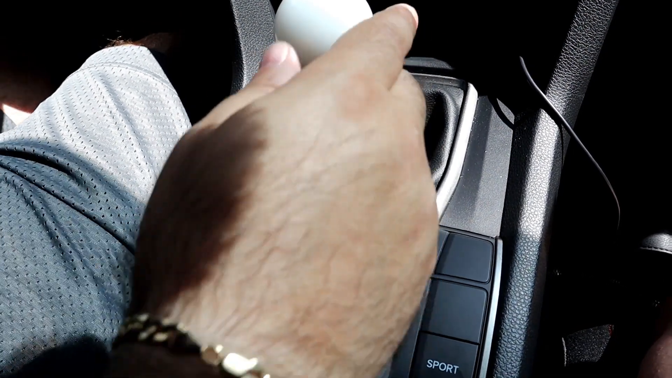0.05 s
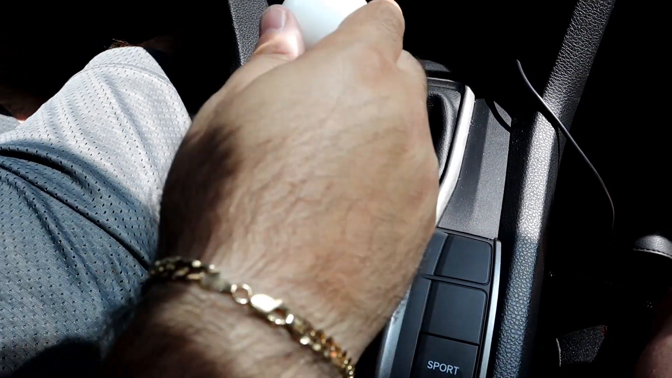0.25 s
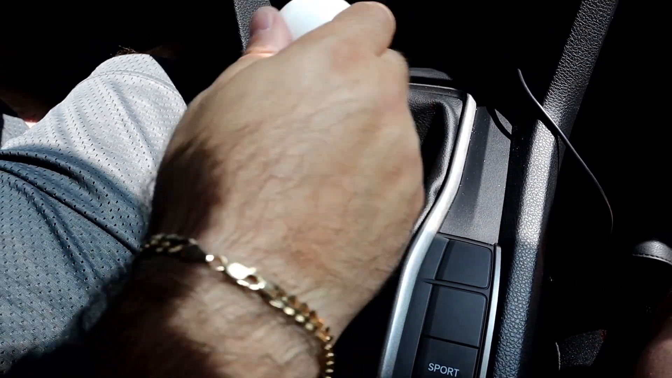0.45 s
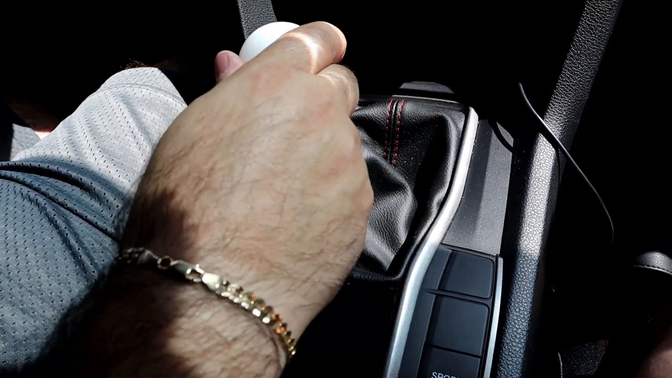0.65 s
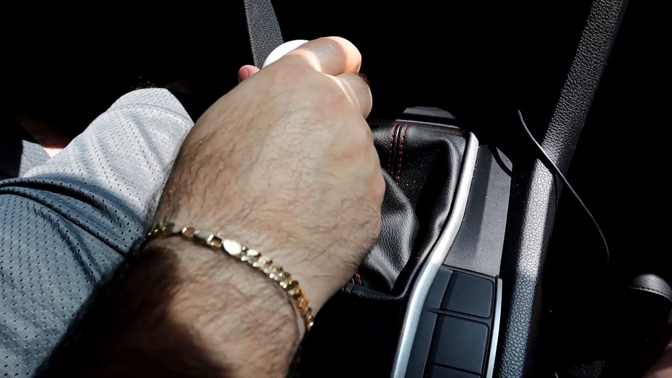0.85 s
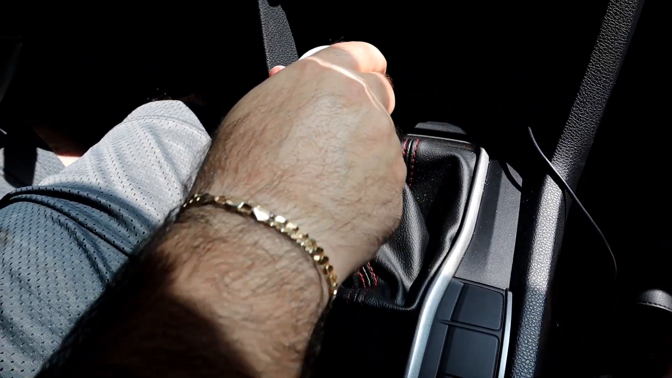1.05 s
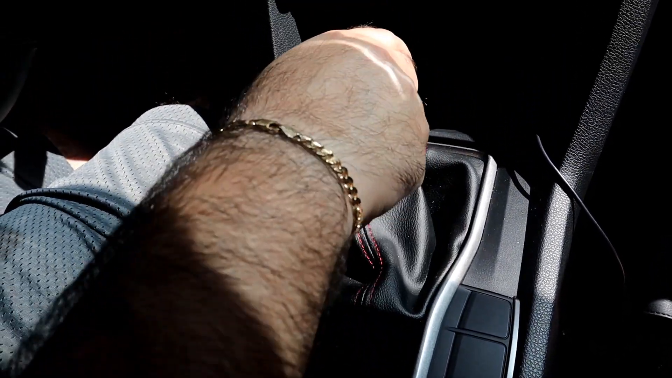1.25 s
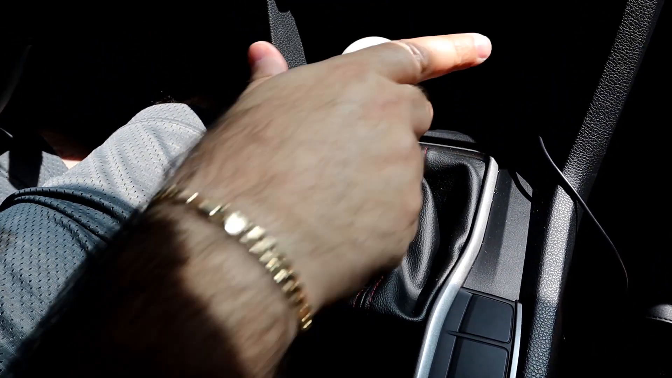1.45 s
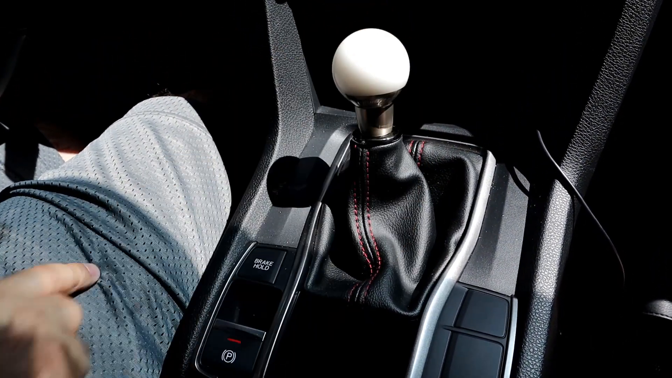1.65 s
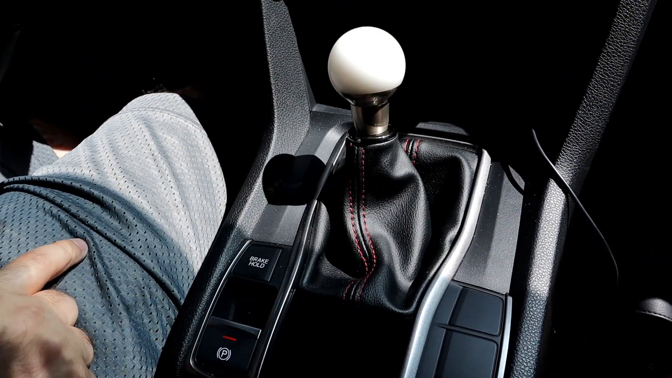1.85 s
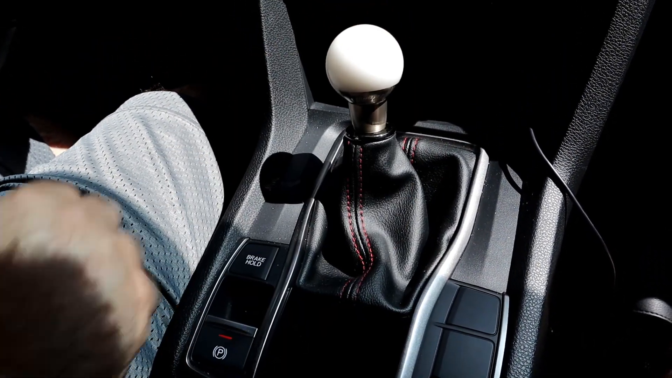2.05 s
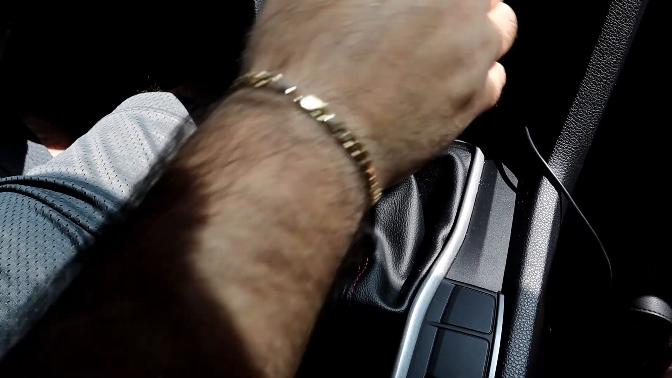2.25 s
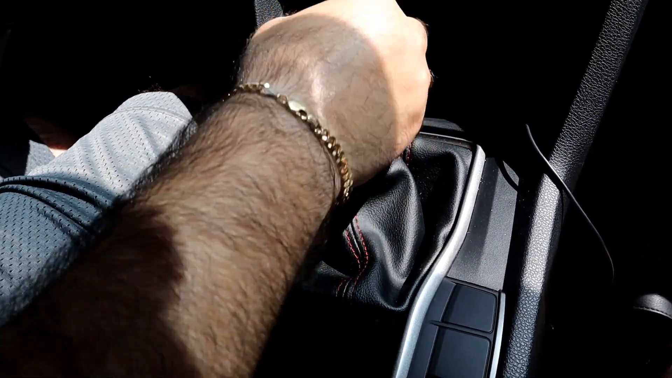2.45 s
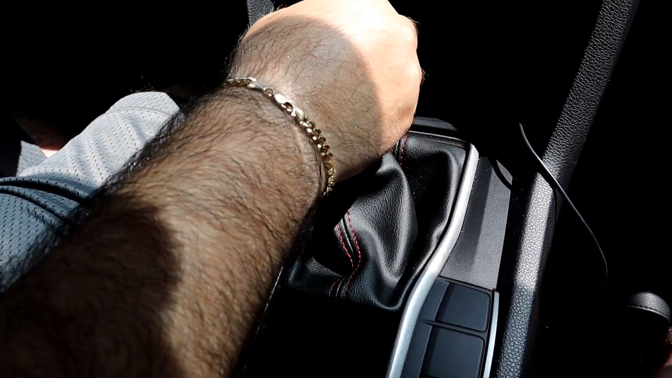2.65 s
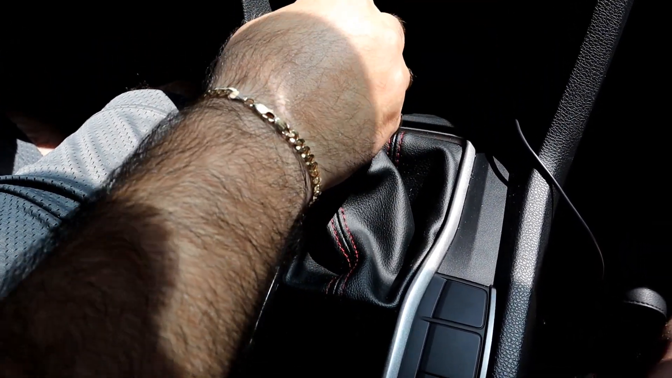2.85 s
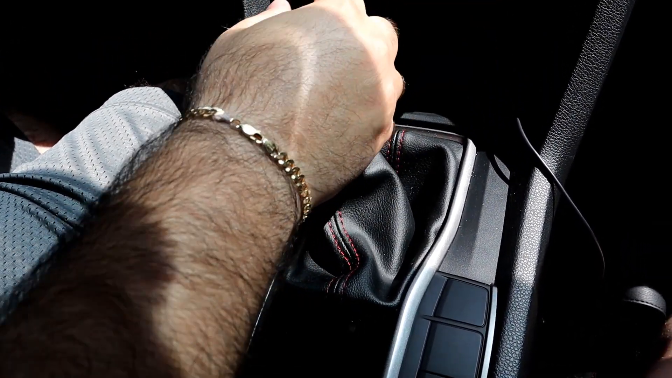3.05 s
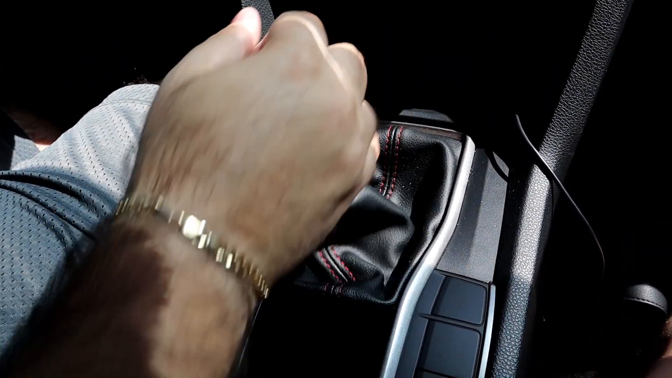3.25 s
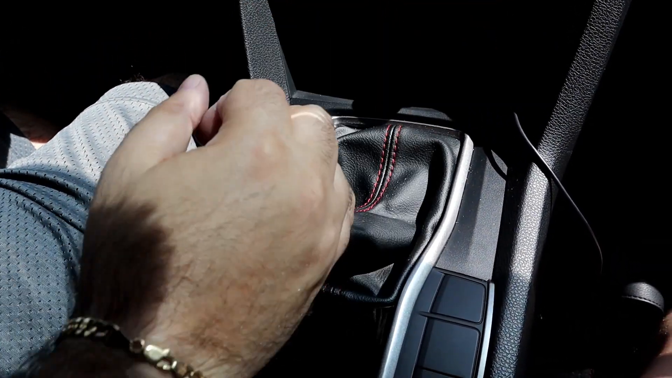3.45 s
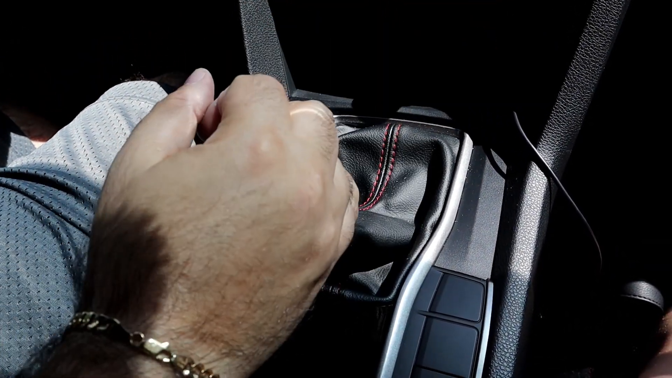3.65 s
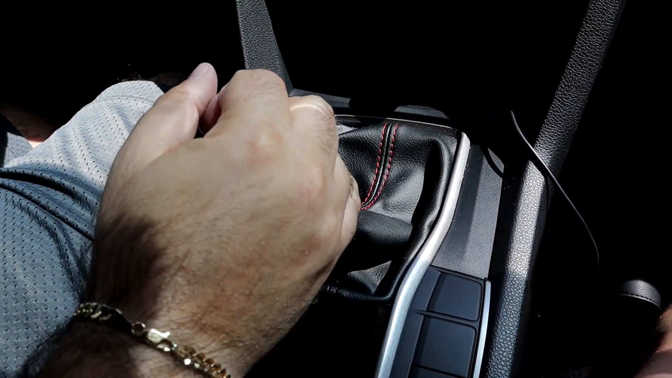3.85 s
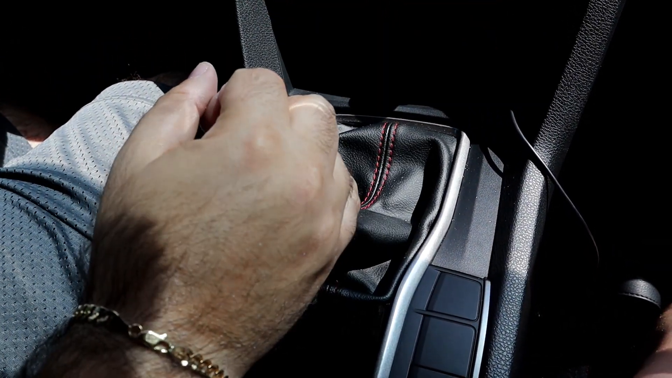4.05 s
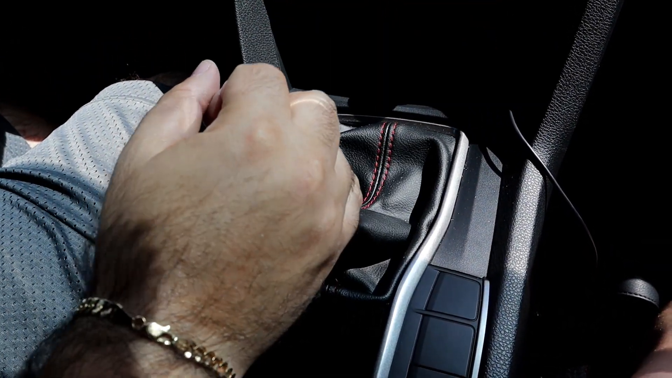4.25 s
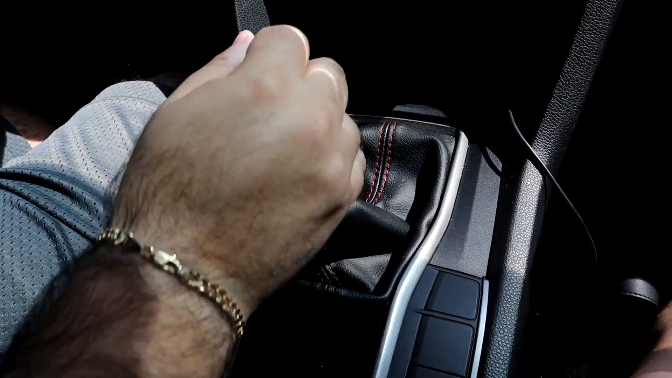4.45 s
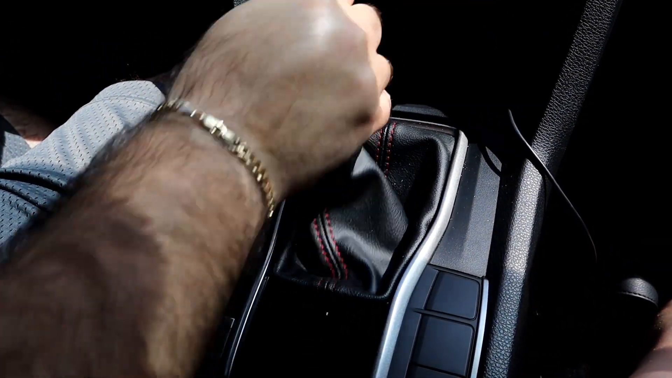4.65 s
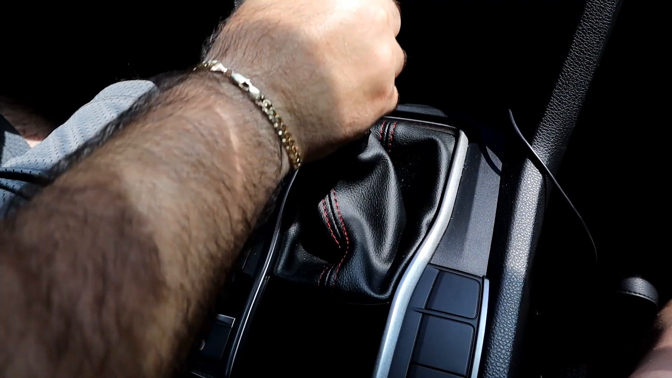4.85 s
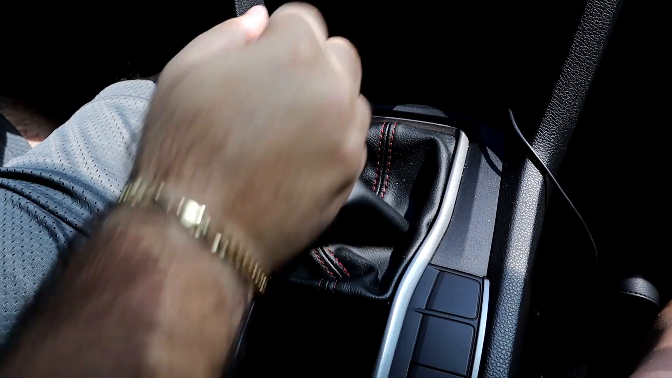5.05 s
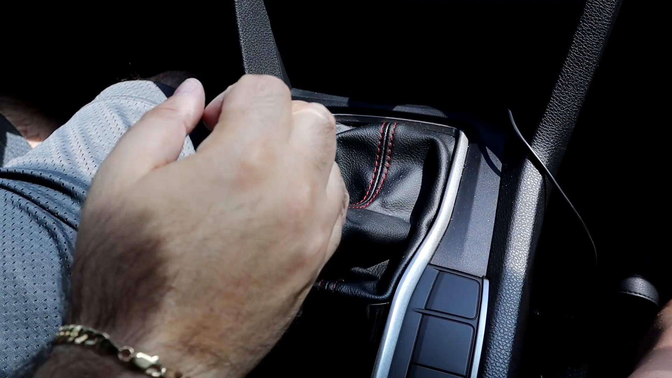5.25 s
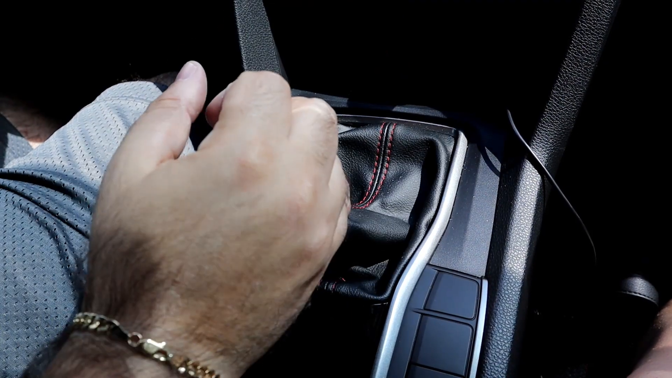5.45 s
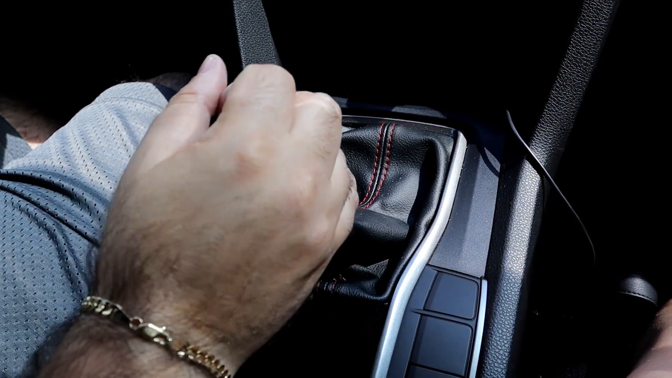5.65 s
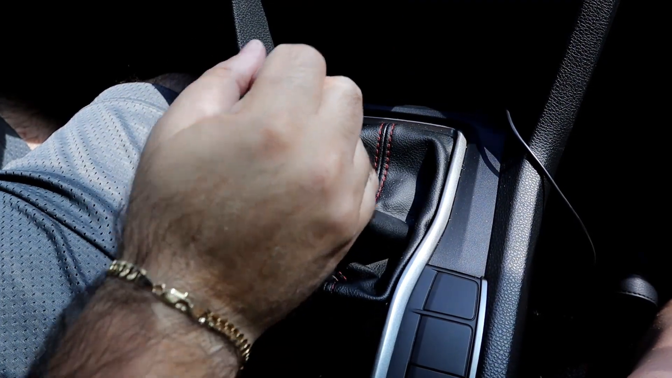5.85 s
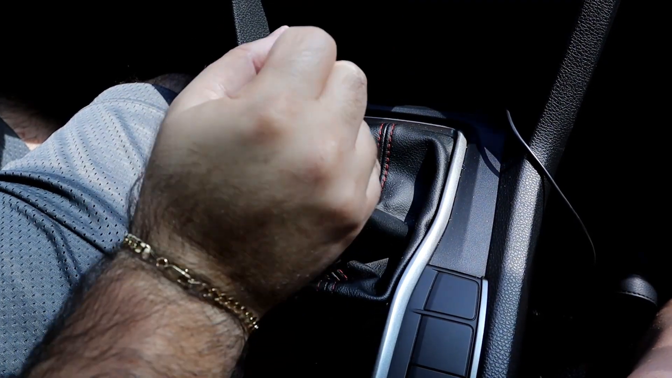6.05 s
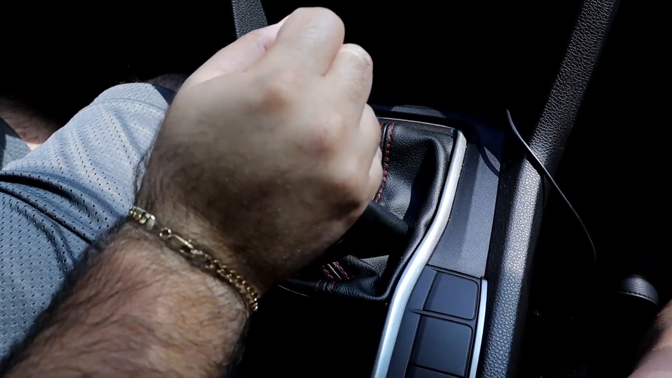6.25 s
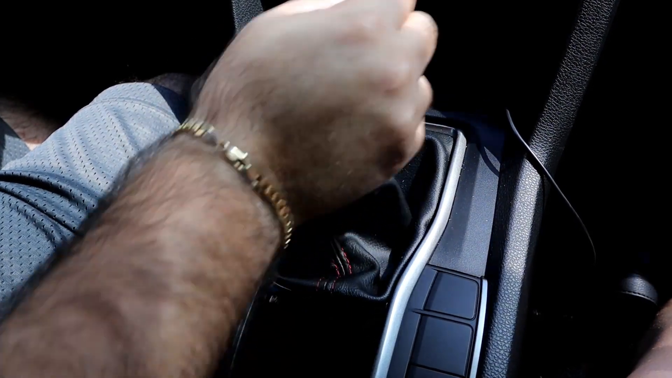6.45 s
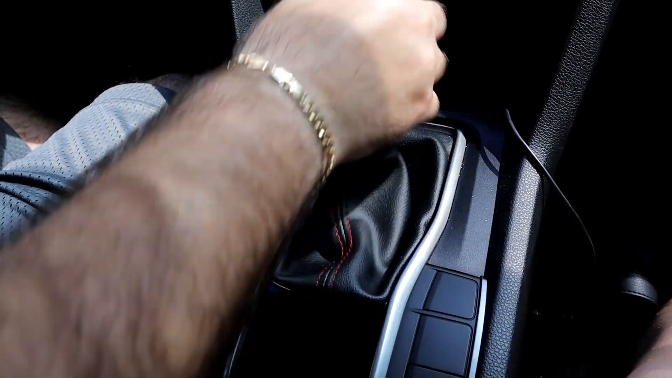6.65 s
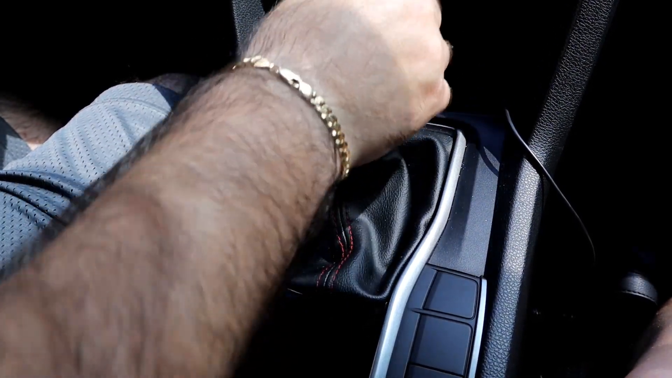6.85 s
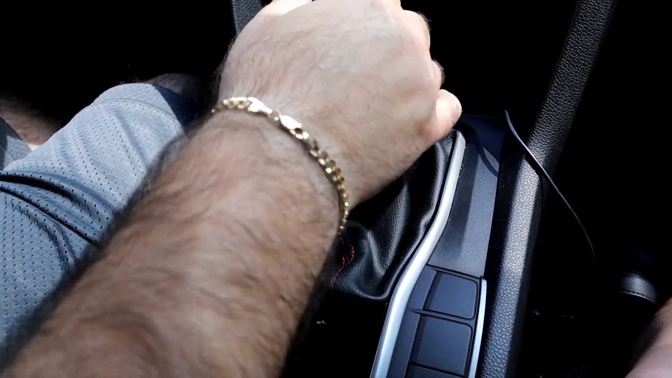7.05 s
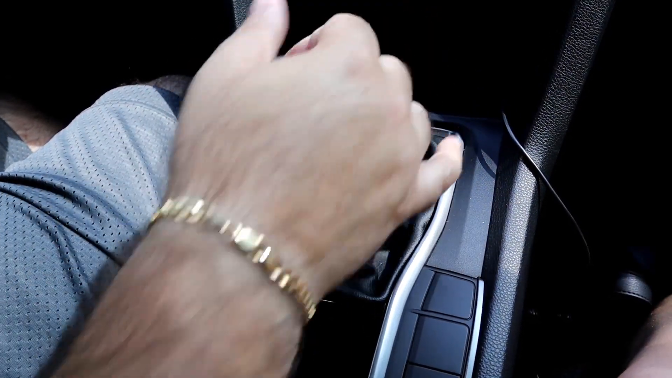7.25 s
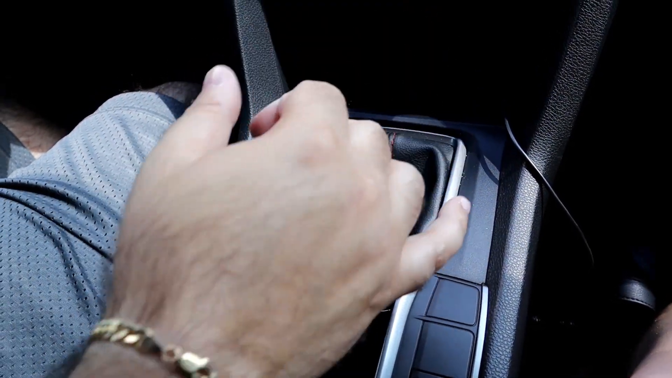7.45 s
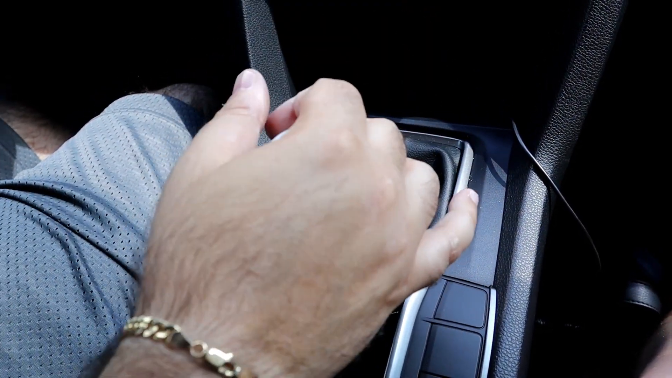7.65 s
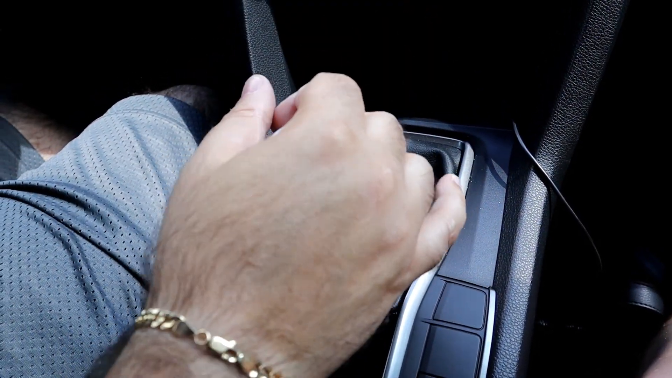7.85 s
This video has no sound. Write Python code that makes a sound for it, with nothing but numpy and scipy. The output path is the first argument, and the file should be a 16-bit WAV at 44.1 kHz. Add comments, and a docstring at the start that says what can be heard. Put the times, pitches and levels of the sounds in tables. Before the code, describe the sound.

A manual gear lever clunks and knocks through its gate inside a parked car while a four-cylinder engine idles with a low, steady boom.

```python
"""A four-cylinder engine idles and makes the cabin of a parked car boom: drifting firing orders over noise.
A hand works the manual gear lever: it slides through the gate as filtered noise, clicks over the detent and
clunks against its stop, as impulses that ring the modes of linkage and console. The leather boot creaks.
A chain bracelet chinks in short noise bursts, and the hand brushes over clothing in swells of noise.
The level dips after the hardest clunks and creeps back."""
import sys
import numpy as np
from scipy import signal
from scipy.io import wavfile
from scipy.ndimage import uniform_filter1d

SR = 44100
rng = np.random.default_rng(int(sys.argv[2]) if len(sys.argv) > 2 else 0)


def wav_out(sig):
    """Save sig, one row per channel (or a flat mono array), as 16-bit PCM at SR to the path in sys.argv[1]."""
    wavfile.write(sys.argv[1], SR, np.round(np.clip(np.atleast_2d(sig).T, -1, 1) * 32767).astype(np.int16))


N = 348390
TIME = np.arange(N) / SR


def from_db(db):
    """Amplitude ratio of a level in dB."""
    return 10 ** (np.asarray(db) / 20)


def rms_one(x):
    """Scale to an rms of 1."""
    return x / np.sqrt(np.mean(x ** 2) + 1e-20)


def in_time(rows):
    """Value column of a (time, value) curve, sample by sample."""
    times_s, values = np.transpose(rows)
    return np.interp(TIME, times_s, values)


def at_hz(points, hz):
    """Read a table on a log-frequency axis."""
    points = np.array(points)
    return np.interp(np.log(hz), np.log(points[:, 0]), points[:, 1])


def drift(rate_hz):
    """Slow random wander with a spread of 1, computed at every 100th sample."""
    r = np.exp(-200 * np.pi * rate_hz / SR)
    white = rng.standard_normal(N // 100 + 1002)
    slow = signal.lfilter([1], [1, -2 * r, r * r], white)[1000:]   # drop the run-in
    return np.interp(np.arange(N) / 100, np.arange(len(slow)), rms_one(slow))


def filtered(x, cutoff_hz, kind):
    """Second-order Butterworth design: low, high or band."""
    return signal.sosfilt(signal.butter(2, cutoff_hz, kind, fs=SR, output="sos"), x)


def clicks(times_s, heights):
    """One impulse at each time."""
    out = np.full(N, 1e-18)
    out[np.round(np.asarray(times_s) * SR).astype(int)] += heights
    return out


def ring(force, hz, t60_s):
    """Damped resonance: a unit click sets a sine of height 1 ringing."""
    r = np.exp(-np.log(1000) / (t60_s * SR))
    w = 2 * np.pi * hz / SR
    return signal.lfilter([0, np.sin(w)], [1, -2 * r * np.cos(w), r * r], force)


def fade(force, t60_s, swell_hz):
    """Envelope that swells within about a period of swell_hz, then decays; overlaps add in power."""
    decay = np.exp(-2 * np.log(1000) / (t60_s * SR))
    envelope = np.sqrt(signal.lfilter([1], [1, -decay], force ** 2))
    r = np.exp(-np.pi * swell_hz / SR)
    return signal.lfilter([(1 - r) ** 2], [1, -2 * r, r * r], envelope)


def noise_bands(spectrum):
    """Yield log-spaced noise bands as (Hz, band), total power 1 shared out by the spectrum."""
    edges_hz = np.geomspace(spectrum[0][0], 16500, 23)
    centres_hz = np.sqrt(edges_hz[1:] * edges_hz[:-1])
    white = rng.standard_normal((2, N))   # neighbouring bands use different noise
    gains = from_db(at_hz(spectrum, centres_hz)) * np.sqrt(np.diff(edges_hz))
    gains = gains / np.linalg.norm(gains)
    for k, hz in enumerate(centres_hz):
        yield hz, gains[k] * rms_one(filtered(white[k % 2], edges_hz[k:k + 2], "band"))


def swells(rows, roundness=1.42):
    """Each (s, peak dB, rise s, fall s) climbs 20 dB to its peak and sinks again; overlaps add in power."""
    power = np.zeros(N)
    for s, db, rise_s, fall_s in rows:
        near = slice(*np.searchsorted(TIME, [s - 3 * rise_s, s + 3 * fall_s]))
        away = np.maximum((s - TIME[near]) / rise_s, (TIME[near] - s) / fall_s)
        power[near] += from_db(db - 20 * away ** roundness) ** 2
    return np.sqrt(power)


def rub(strokes, colour, grain_db):
    """Friction: noise that catches and slips in fine grains of limited size."""
    grain = from_db(grain_db * np.tanh(drift(71)))
    return swells(strokes) * grain * sum(band for _, band in noise_bands(colour))


# idle speed: (time [s], firing rate [1/s])
IDLE_SPEED = [(0.0, 24.28), (0.55, 24.3), (1.05, 24.25), (1.5, 24.0), (2.4, 24.01), (3.3, 24.01),
              (4.2, 23.96), (5.1, 23.93), (5.4, 24.2), (6.0, 23.92), (7.0, 24.06), (7.9, 23.98)]
# build-up of the cabin boom: (time [s], relative level [dB])
BOOM_BUILDUP = [(0, -4.5), (.9, -3), (1.05, 0), (7.9, 1)]
# engine orders: (multiple of the firing rate, relative level [dB])
FIRING_ORDERS = [(1, -14), (2, 0), (3, -1), (4, 0.5), (5, -8), (6, -17), (7, -29.5), (8, -8), (9, -44.5),
                 (10, -45.5), (11, -23), (12, -30.5), (13, -28.5), (14, -37.5), (15, -26.5), (16, -33),
                 (17, -45.5), (18, -44), (19, -43), (20, -35.5)]


def engine(first_firing_s=.0318, smear_rad=.42, waver=0.13, upper_waver=0.47):
    """Firing orders boom in the cabin, which delays the higher ones more; the upper orders waver most."""
    rate = in_time(IDLE_SPEED)
    boom_db = in_time(BOOM_BUILDUP)
    firing_phase = 2 * np.pi * (np.cumsum(rate) / SR - first_firing_s * rate[0])
    second_gain = from_db(-17 + boom_db)
    other_gain = from_db(-19.5 + 0.24 * boom_db)   # these follow only part of the build-up
    out = 0
    for order, db in FIRING_ORDERS:
        gain = second_gain if order == 2 else other_gain
        unsteady = waver if order < 9 else upper_waver
        angle = order * firing_phase - smear_rad * order ** 2
        tone = (1 + unsteady * drift(6.6)) * np.cos(angle) + unsteady * drift(5.6) * np.sin(angle)
        out = out + np.sqrt(2) * from_db(db) * gain * tone
    return out, firing_phase


# engine and fan noise through the bulkhead: (frequency [Hz], relative density [dB per Hz])
BULKHEAD_NOISE = [(30, -0.5), (130, 1.5), (220, -4.5), (330, -8.5), (460, -12.5), (720, -14), (1100, -20),
                  (1400, -21.5), (1750, -31), (2050, -28.5), (2500, -38), (4000, -40.5), (7000, -45),
                  (15500, -48.5)]


def cabin_noise(firing_phase, level_db=-32, throb=0.46, patchy_db=2.0, whine_hz=3284, whine_db=-74):
    """Mechanical noise throbs with the engine under smooth fan hiss and a thin whine."""
    pulse = 1 + throb * np.cos(2 * firing_phase)
    noise = 0
    for hz, band in noise_bands(BULKHEAD_NOISE):
        noise = noise + band * (pulse * from_db(patchy_db * drift(8.1)) if hz < 550 else 1)
    whine = np.sqrt(2) * np.sin(2 * np.pi * np.cumsum(whine_hz + 6 * drift(20)) / SR)
    return from_db(level_db) * noise + from_db(whine_db) * whine


# hand strokes over clothing: (time [s], peak level [dB], rise [s], fall [s])
BRUSH_STROKES = [(.15, -57, .3, .25), (1.755, -45, 0.18, 0.055), (2.11, -43.5, .14, .08),
                 (7.46, -47, .06, .05)]
# colour of the brushing: (frequency [Hz], relative density [dB per Hz])
CLOTH_COLOUR = [(500, -8.5), (1400, 9), (2100, 1.5), (3200, 2), (5000, -2), (6500, -8.5), (7800, -12.5),
                (15000, -21)]


def clothing():
    """The hand brushes over cloth: grainy friction noise in slow swells."""
    return rub(BRUSH_STROKES, CLOTH_COLOUR, grain_db=1.0)


# bracelet links: (time [s], relative level [dB], pitch [Hz])
BRACELET_CHINKS = [(0.143, -46, 2640), (0.301, -46, 2870), (0.754, -39, 2140), (1.093, -53, 4200),
                   (1.437, -48, 3800), (2.451, -49, 4100), (3.445, -47, 2870), (4.701, -46, 4100),
                   (5.126, -42, 3400), (6.474, -40, 3500), (6.509, -38, 3500), (6.538, -49, 4100),
                   (7.374, -55, 4880)]


def bracelet(level_db=1, t60_s=0.05, width=0.11):
    """Small links jostle: each chink is a short narrow noise burst at its own pitch."""
    out, white = 0, rng.standard_normal(N)
    for s, db, hz in BRACELET_CHINKS:
        band = filtered(white, [hz / (1 + width), hz * (1 + width)], "band")
        out = out + rms_one(band) * fade(clicks([s], from_db(db + level_db)), t60_s, hz)
    return out


# folds of the leather boot: (frequency [Hz], relative level [dB], t60 [s])
FOLD_MODES = [(2100, 0.5, 0.0053), (2430, -0.5, 0.0051), (2580, 0, 0.0074)]
# flexing of the boot: (time [s], peak level [dB], rise [s], fall [s])
BOOT_FLEXES = [(.58, -51, 0.069, .06), (3.31, -50, 0.12, .12), (3.435, -45, 0.16, 0.036),
               (4.39, -52, .12, 0.29), (4.67, -52.5, .2, .1), (5.14, -49.5, .13, 0.13),
               (5.27, -51, 0.085, 0.052), (5.69, -52, 0.049, 0.077), (5.78, -54, 0.068, 0.074)]


def boot(slips_per_s=600, uneven_db=4, top_hz=3000, flex_db=4):
    """Folds of soft leather stick and slip; each rings at its own pitch and flexes in its own time."""
    creak = 0
    for hz, db, t60_s in FOLD_MODES:
        sizes = from_db(uneven_db * np.clip(rng.standard_normal(N), -2, 2))
        slips = (rng.random(N) < slips_per_s / SR) * sizes
        flex = from_db(db + flex_db * np.tanh(drift(24)))
        creak = creak + flex * ring(np.diff(slips, prepend=0), hz, t60_s)
    return swells(BOOT_FLEXES) * rms_one(filtered(creak, top_hz, "low"))


# lever going into gear: (stop time [s], stop knock level [dB], stop click level [dB], stop thud level [dB],
# seating delay [s], seating boom level [dB], seating thud reference [dB], slide peak level [dB], approach [s])
GEAR_SHIFTS = [(0.598, -27, -57, -19, 0.0044, -10, -16.5, -45.5, 0.071),
               (1.183, -15, -39, -13, .010, -15.5, -20, -38, 0.084),
               (3.404, -23.5, -43, -16.5, .011, -16.5, -9.5, -40.5, 0.13),
               (4.782, -17.5, -36.5, -11.5, 0.0081, -15.5, -13.5, -37, 0.055),
               (5.198, -20, -25, -9, .025, -16, -7, -44, 0.22),
               (6.495, -19.5, -33.5, -22, .015, -20, -12.5, -38.5, .04),
               (6.707, -15, -30.5, -15, 0.0065, -3, -9.5, -42.5, 0.046),
               (7.405, -18.5, -38.5, -13.5, .012, -16, -3, -39.5, 0.039)]
# lighter taps in the gate: (time [s], thud level [dB], knock level [dB], click level [dB]), all relative
GATE_TAPS = [(1.131, -22.5, -34, -64), (2.475, -29, -30.5, -44.5), (3.311, -22.5, -33, -55),
             (4.667, -26, -30, -52), (4.675, -19.5, -24.5, -53), (4.755, -19, -32, -58),
             (4.975, -25, -30, -53), (5.209, -12, -22, -48), (6.666, -21.5, -38, -55),
             (7.285, -19.5, -33.5, -54)]


def slides(release_s=0.05, tap_slide_db=-21, tap_approach_s=0.036):
    """The lever slides up to every shift and tap, then comes to rest: (s, peak dB, rise s, fall s)."""
    into_gear = [(s, db, approach_s, release_s) for s, *_, db, approach_s in GEAR_SHIFTS]
    in_gate = [(s, knock + tap_slide_db, tap_approach_s, release_s) for s, _, knock, _ in GATE_TAPS]
    return into_gear + in_gate


# colour of the sliding: (frequency [Hz], relative density [dB per Hz])
GATE_COLOUR = [(300, -3), (900, 8.5), (1900, -2), (2600, -8), (3600, -13), (6000, -17.5), (14000, -30)]
# lever, housing and console: (frequency [Hz], relative level [dB], t60 [s])
LINKAGE_MODES = [(243, -10.5, 0.062), (298.6, 1, 0.053), (351, -2.5, 0.075), (393.5, -2, 0.077),
                 (556, -6.5, 0.093), (682, -2.5, 0.059), (783, -3.5, 0.069), (1061, -2, 0.034),
                 (1376, 0, 0.047), (1580, 0.5, 0.048), (2062, -6, 0.067), (2554, -7.5, 0.037),
                 (3557, 5, 0.017), (3950, -16, 0.017), (5920, -15.5, 0.042)]


def gate_friction(grain_db=1.5, body_db=7):
    """The sliding lever hisses in its gate and faintly rings the parts that its contacts strike."""
    friction = rub(slides(), GATE_COLOUR, grain_db)
    body = 0
    for k, (hz, _, t60_s) in enumerate(LINKAGE_MODES):
        unity = 2 * np.log(1000) / (t60_s * SR)   # gain near 1 at the mode's pitch
        body = body + (-1) ** k * ring(friction, hz, t60_s) * unity
    return friction + from_db(body_db) * body


def chatter(ticks_per_s=130, level_db=-10, uneven_db=3, low_hz=1500):
    """Play in the linkage ticks at random during slides; such light touches ring mainly the upper modes."""
    sizes = from_db(level_db + uneven_db * np.tanh(rng.standard_normal(N)))
    ticks = (rng.random(N) < ticks_per_s / SR) * sizes * swells(slides()) + 1e-18
    ticks = filtered(ticks, low_hz, "high")
    out = 0
    for k, (hz, db, t60_s) in enumerate(LINKAGE_MODES):
        out = out + (-1) ** k * from_db(db) * ring(ticks, hz, t60_s)
    return out


def contacts(catch_lead_s=0.011, settle_s=.014, settle_loss_db=10.5, hard_boom_db=-2.5):
    """A shift is catch, stop, seating, settling; a tap is one contact: (s, boom, thud, knock, click dB)."""
    rows = [(s, thud + hard_boom_db, thud, knock, click) for s, thud, knock, click in GATE_TAPS]
    for s, knock, click, thud, seats_after_s, seat_boom, seat_thud, _, _ in GEAR_SHIFTS:
        stop = np.array([thud + hard_boom_db, thud, knock, click])
        catch = stop + [-7, -7, -13, -19]   # the detent catches more softly, just before the stop
        seat = np.array([seat_boom, seat_thud, knock - 14, click - 14.5])
        seated_s = s + seats_after_s
        rows += [(s - catch_lead_s, *catch), (s, *stop), (seated_s, *seat)]
        rows += [(seated_s + settle_s, *(seat - settle_loss_db))]   # rocks once more
    return rows


# centres of boom, thud, knock and click: (frequency [Hz])
CONTACT_REGISTERS = [280, 400, 850, 3200]
# contacts scattered round the cabin: (frequency [Hz], relative density [dB per Hz])
CABIN_SCATTER = [(120, 1), (200, 7), (380, 4.5), (500, -4.5), (750, -0.5), (1500, -2.5), (1900, -3),
                 (2600, -3.5), (3700, -2.5), (5800, -17), (7200, -30), (10000, -21), (15000, -53)]
# cabin decay: (frequency [Hz], t60 [s])
CABIN_T60 = [(250, 0.098), (1000, 0.11), (6000, 0.04)]


def lever(ring_db=-1, scatter_db=2, crack_db=5, crack_t60_s=0.0039, uneven_db=3.0, travel_s=0.0011):
    """Each contact cracks, rings the modes of linkage and console, and scatters briefly round the cabin."""
    times_s, *registers_db = np.transpose(contacts())
    knock_hz = CONTACT_REGISTERS[2]

    def strength_db(hz):
        """Level of every contact at hz, between its boom, thud, knock and click."""
        log_registers = np.log(CONTACT_REGISTERS)
        return np.array([np.interp(np.log(hz), log_registers, row) for row in np.transpose(registers_db)])

    out = 0
    uneven = uneven_db * rng.standard_normal((len(times_s), len(LINKAGE_MODES)))
    for k, (hz, db, t60_s) in enumerate(LINKAGE_MODES):
        lag_s = travel_s * np.sqrt(knock_hz / hz)   # bending waves carry the low modes more slowly
        heights = from_db(strength_db(hz) + db + ring_db + uneven[:, k])
        out = out + (-1) ** k * ring(clicks(times_s + lag_s - travel_s, heights), hz, t60_s)
    for hz, band in noise_bands(CABIN_SCATTER):
        force = clicks(times_s, from_db(strength_db(hz) + scatter_db))
        tail = fade(force, at_hz(CABIN_T60, hz), hz)
        crack = from_db(crack_db) * fade(force, crack_t60_s, hz)
        crack = crack * hz / (hz + knock_hz)   # weak in the bass
        out = out + band * np.hypot(tail, crack)
    return out


def level_dips(x, sense_hz=230, sense_s=0.049, threshold_db=-17.5, most_db=3, recovery_db_per_s=3.5,
               ease_s=0.073):
    """Loud sound above the engine boom turns the level down; it then creeps back."""
    sensed = filtered(x[0], sense_hz, "high")
    level_db = 10 * np.log10(np.abs(uniform_filter1d(sensed ** 2, int(sense_s * SR))) + 1e-12)
    over_db = np.clip(level_db - threshold_db, 0, most_db)
    recovered_db = recovery_db_per_s * TIME
    drop_db = np.maximum.accumulate(over_db + recovered_db) - recovered_db
    r = np.exp(-1 / (ease_s * SR))
    return x * from_db(-signal.lfilter([1 - r], [1, -r], drop_db))


def scene():
    """Engine, lever and hand, all close together in the cabin."""
    boom, firing_phase = engine()
    hand = bracelet() + clothing()
    shifter = lever() + gate_friction() + boot() + chatter()
    return (boom + cabin_noise(firing_phase) + shifter + hand)[None, :]


def record(dry, cutoff_hz=15800):
    """Level dips, then a steep cut of the top."""
    steep = signal.ellip(12, .1, 90, cutoff_hz, fs=SR, output="sos")
    return signal.sosfilt(steep, level_dips(dry))


dry = scene()
out = record(dry)
wav_out(out)
```